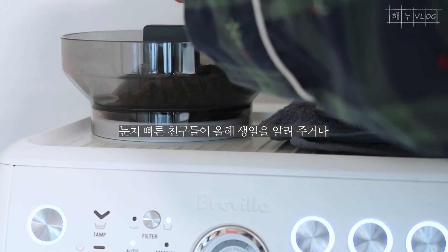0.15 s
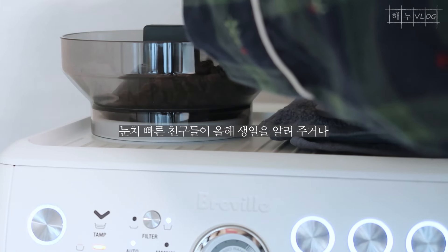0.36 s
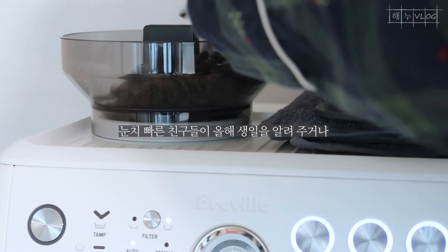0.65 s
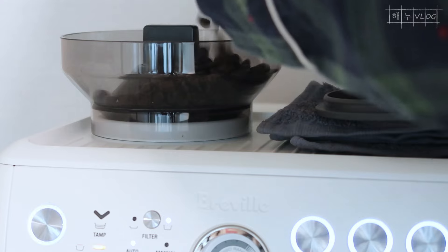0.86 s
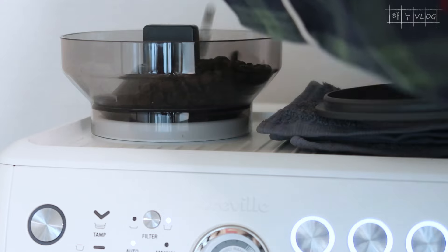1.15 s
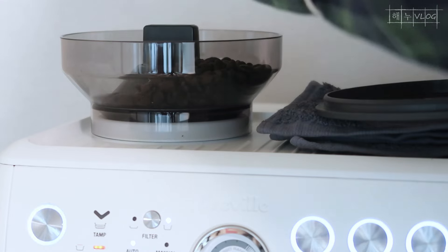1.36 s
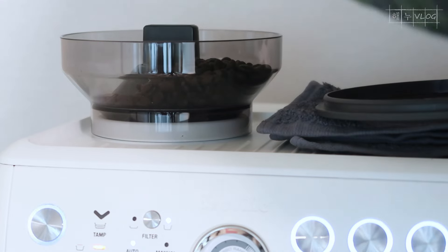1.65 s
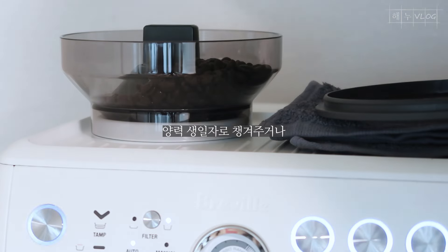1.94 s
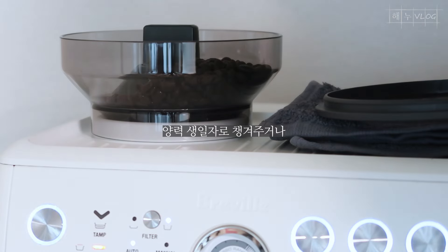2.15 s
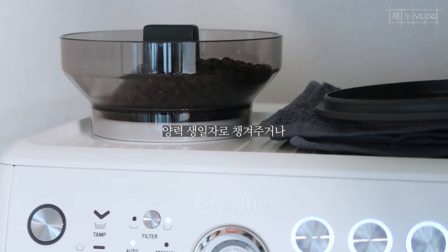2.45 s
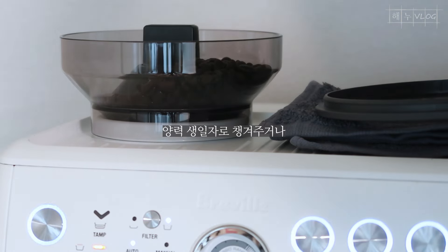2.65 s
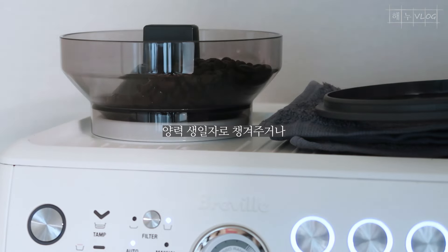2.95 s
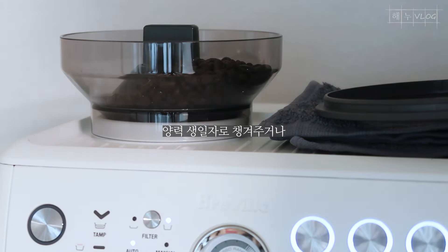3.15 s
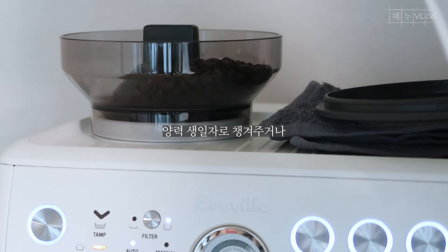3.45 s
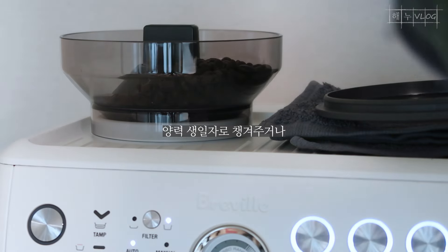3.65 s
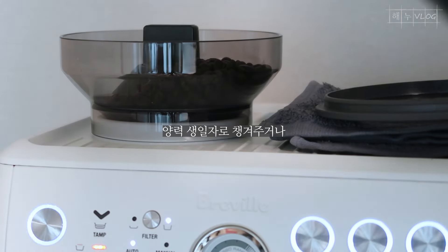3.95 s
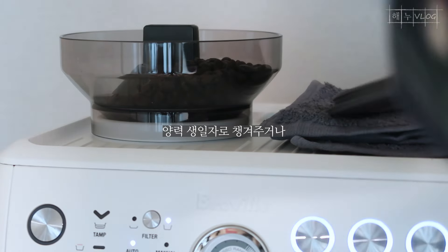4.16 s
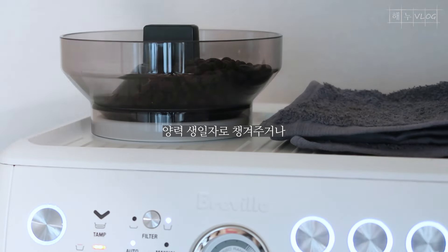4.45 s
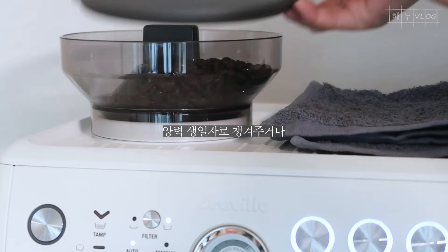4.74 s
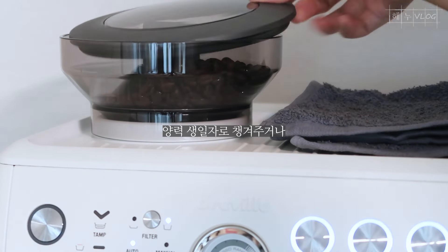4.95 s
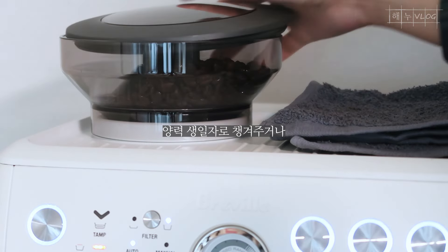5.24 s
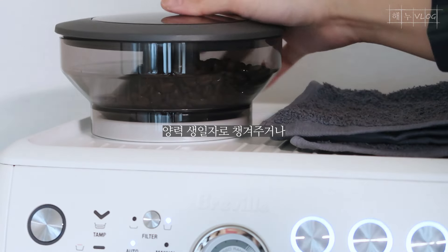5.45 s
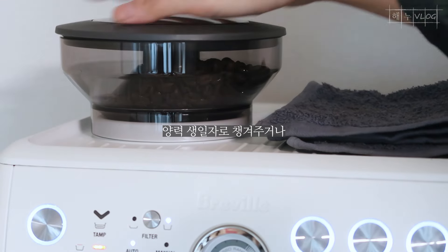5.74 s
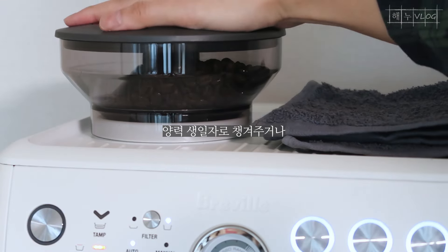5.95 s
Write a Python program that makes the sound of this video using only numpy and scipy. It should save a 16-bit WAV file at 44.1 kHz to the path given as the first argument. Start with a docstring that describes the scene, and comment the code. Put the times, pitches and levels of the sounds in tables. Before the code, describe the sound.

Coffee beans are shaken into a grinder's plastic hopper from the start, rattling in bright, uneven bursts that ring the wall and thin out by about 1.5 seconds. From 1.8 seconds a hard canister slides on the counter with a faint gritty scrape and light taps, and one firmer knock near 2.4 seconds. Two louder clusters of sharp knocks follow at about 3.4 and 3.6 seconds. At 4.2 seconds a plastic lid is lifted with a light clack. It clatters onto the hopper around 4.9 seconds, its rim rubbing briefly, then is pressed down with soft clicks and hollow thumps near 5.3, 5.5 and 5.9 seconds while the casing rumbles faintly. Everything is heard close up in a small kitchen with a short echo, over a low appliance hum and soft room noise.

```python
"""In a small kitchen, coffee beans are shaken from a hard canister into a grinder's hopper (its funnel).
The beans tick against each other and make the hopper wall ring. The canister slides and knocks on the
counter. Then a plastic lid is lifted, dropped on the hopper and pressed home, and the casing shudders.
An appliance hums over the room noise. Two close microphone ports hear it, differing mainly in treble."""
import sys
import numpy as np
from scipy import signal
from scipy.fft import rfft, irfft, next_fast_len
from scipy.io import wavfile
from scipy.ndimage import uniform_filter1d

SR = 44100
rng = np.random.default_rng(int(sys.argv[2]) if len(sys.argv) > 2 else 0)


def generate_wav(signal):
    """Clip the signal to [-1, 1] and save it as 16-bit WAV at the path in sys.argv[1]."""
    frames = np.transpose(np.atleast_2d(signal))
    scaled = np.clip(frames, -1, 1) * 32767
    pcm = np.round(scaled).astype(np.int16)
    wavfile.write(sys.argv[1], SR, pcm)


N = 268569
T = np.arange(N) / SR


def undb(db):
    """Turn decibels into a number to multiply by."""
    return 10 ** (np.asarray(db) / 20)


def at_hz(table, hz):
    """Read between rows of (pitch in Hz, value), spacing octaves evenly."""
    pitches, values = np.transpose(table)[:2]
    return np.interp(np.log(np.maximum(hz, 1)), np.log(np.maximum(pitches, 1)), values)


def colour(x, table):
    """Change a sound's tone by rows of (pitch in Hz, gain in dB)."""
    return irfft(rfft(x) * undb(at_hz(table, np.fft.rfftfreq(len(x), 1 / SR))), len(x))


def unit(x):
    """Scale a sound to an average (rms) level of 1."""
    return x / np.sqrt(np.mean(x ** 2))


def wander(rate):
    """A smooth random wobble of about 1, with a new target rate times a second."""
    hold = int(SR / rate)
    steps = np.repeat(rng.standard_normal(N // hold + 1), hold)
    return 1.3 * uniform_filter1d(uniform_filter1d(steps, hold), hold)[:N]


def curves(table):
    """Join timed rows into one dB curve per column, silent before and after."""
    times, *columns = np.transpose(table)
    return [np.interp(T, times, column, left=-120, right=-120) for column in columns]


def clicks(rate, scatter_db):
    """Random clicks of uneven size, about rate of them a second."""
    spikes = (rng.random(N) < rate / SR) * rng.choice([-1, 1], N)
    return spikes * undb(scatter_db * np.minimum(rng.exponential(size=N), 4))


def ring(hz, db, fade_s):
    """A struck object's tones: each has a slightly random strength and falls 60 dB in fade_s."""
    t = np.arange(int(min(fade_s.max(), .08) * SR)) / SR
    gain = undb(db + 2 * rng.standard_normal(len(hz)))
    gain *= (-1) ** np.arange(len(hz))  # neighbours swing opposite ways
    return gain @ (np.exp(-np.log(1000) * t / fade_s[:, None]) * np.sin(2 * np.pi * hz[:, None] * t))


def contacts(length_ms, swell, count):
    """One blow is many tiny touches; they grow for the share of it called swell, then weaken."""
    touches, chance = np.zeros(2048), rng.random((count, 2))
    place = np.r_[0, chance[1:, 0]]
    shape_db = np.where(place < swell, -14 * (1 - place / swell), -8 * (place - swell) / (1 - swell))
    when = (place * length_ms * SR / 1000).astype(int)
    np.add.at(touches, when, undb(3.1 * np.log(chance[:, 1]) + shape_db))
    spectrum = rfft(touches)
    even = spectrum / np.sqrt(uniform_filter1d(np.abs(spectrum) ** 2, size=5))  # favour no pitch
    return irfft(even) * (np.arange(2048) < 1500)


def blows(events, tones, tilt, band_hz, crack_db, crack_cycles, crack_fade_s, swell, touches):
    """Each blow rings the object's tones plus a crack of short ones; its peak is set within band_hz."""
    out, crack_hz = np.zeros(N), np.geomspace(110, 15000, 64)
    own_hz, own_db, own_fade_s = tones
    crack_levels = crack_db - 20 * np.clip(np.log2(220 / crack_hz), 0, 1)  # weaker in the bass
    band = signal.butter(2, band_hz, "band", fs=SR, output="sos")
    for start, peak_db, favoured_hz, length_ms, *tilt_settings in events:
        hz = np.r_[own_hz, crack_hz]
        hz *= undb(.12 * rng.standard_normal(len(hz)))  # slightly out of tune each time
        fade_s = np.r_[own_fade_s, np.minimum(crack_cycles / hz[-64:] + .002, crack_fade_s)]
        db = np.r_[own_db, crack_levels] + at_hz(tilt(*tilt_settings), hz)
        db += 7.1 * np.exp(-(np.log(hz / favoured_hz) / 0.15) ** 2)  # the struck spot favours a pitch
        blow = signal.fftconvolve(ring(hz, db, fade_s), contacts(length_ms, swell, touches))
        blow *= undb(peak_db) / np.abs(signal.sosfilt(band, blow)).max()
        first = int(start * SR)
        out[first:first + len(blow)] += blow[:N - first]
    return out


# The tone of the room noise. Each row: pitch in Hz, relative level in dB.
NOISE_TONE = [(12, -66), (20, -9.5), (49, -7), (207, -12.5), (245, -8.5), (362, -13.5), (416, -10.5),
              (519, -15.5), (746, -13), (1040, -20.5), (1230, -19), (1630, -22.5), (1820, -22.5),
              (13100, -44.5), (15500, -118)]
# How much that noise differs between the ports. Each row: pitch in Hz, side compared with mid in dB.
NOISE_SIDE = [(60, -31), (110, -11.5), (200, -7), (380, -3), (700, -7), (1290, -3.5), (2380, -1),
              (4400, 1.5), (8120, 0.5), (15000, 0)]


def room_noise():
    """A soft, flickering rush: what both ports share (mid) and how they differ (side)."""
    mid, side = np.zeros(N), colour(colour(rng.standard_normal(N), NOISE_TONE), NOISE_SIDE)
    for low, high in [(10, 150), (150, 600), (600, 2500), (2500, 20000)]:
        band = colour(rng.standard_normal(N), [(low / 1.1, -60), (low, 0), (high, 0), (high * 1.1, -60)])
        flicker_db = (1.46 + 0.69 * np.exp(-low / 900)) * wander(3.94)
        mid += undb(flicker_db) * colour(band, NOISE_TONE)
    gain = undb(-59.5) / np.std(colour(mid, [(280, -60), (300, 0)]))  # sets the level above 300 Hz
    return gain * mid, gain * side


# A low appliance hum, plus faint high tones. Each row: pitch in Hz, average level in dB, waver in dB.
BACKGROUND_TONES = [(59.2, -68, 1.2), (241, -60, 3), (13006, -92, 2.5), (14357, -98, 2.5)]


def hum_and_high_tones():
    """A low appliance hum, plus faint, thin high tones; all of them waver a little."""
    out = np.zeros(N)
    for hz, db, waver_db in BACKGROUND_TONES:
        height = np.sqrt(2) * undb(db + waver_db * wander(11))
        out += height * np.sin(2 * np.pi * hz * T + 0.72 * wander(8.5))
    return out


# The hopper wall's tones. Each row: pitch in Hz, width in Hz (wider dies sooner), relative level in dB.
HOPPER_TONES = [(1185, 47, -0.5), (2163, 25, 3), (2970, 51, 3), (3730, 36, -2.5), (4390, 123, 11.5),
                (5125, 17, 1), (5203, 52, 4.5), (6100, 86, 7), (6656, 59, 2), (7434, 124, 10.5),
                (7950, 43, 1.5), (8960, 190, 6), (10500, 40, -11.5), (11330, 78, -10)]
# Beans rolling between handfuls. Each row: time in seconds, level in dB.
ROLL_LEVELS = [(0, -38), (.045, -45.5), (.09, -41.5), (.135, -46), (.24, -47.5), (.3, -56.5), (.33, -50.5),
               (.385, -58.5), (.405, -43), (.465, -50.5), (.5, -39.5), (.57, -42), (.615, -37), (.655, -43),
               (.695, -41.5), (.72, -39), (.745, -34), (.77, -34), (.81, -39), (.86, -41), (.92, -37.5),
               (.965, -46), (1.0, -40.5), (1.075, -46), (1.11, -38.5), (1.15, -43), (1.19, -50),
               (1.23, -47.5), (1.35, -46), (1.5, -53.5), (1.62, -78)]
# The tone of bean ticks. Each row: pitch in Hz, relative level in dB.
TICK_TONE = [(290, -64), (500, -16), (1030, -20), (1160, 1.5), (1300, -4.5), (2200, -2), (2700, -2.5),
             (2960, 1.5), (3250, -4), (6000, -4), (11600, -15.5), (15500, -36)]


def beans_rolling():
    """Rolling beans tick and ring the wall; a faster roll is less hollow and fizzes more."""
    level_db, = curves(ROLL_LEVELS)
    speed_db = np.clip(level_db + 45.5, -12, 12)  # 0 is a middling roll
    hollow_db, fizz_db = -12 - 0.7 * speed_db, -7 + 0.34 * speed_db
    ticks = unit(colour(clicks(2600, 2.5) * undb(3.4 * wander(43.82)), TICK_TONE))
    hz, width, db = np.transpose(HOPPER_TONES[:1])  # only the lowest tone
    fade_s = 1.2 * np.minimum(0.78 / width, .014)
    hollow = unit(signal.fftconvolve(clicks(250, 0.79), ring(hz, db, fade_s))[:N])
    fine_ticks = clicks(3300, 3.1) * undb(5.5 * wander(60.4))
    fizz = unit(colour(fine_ticks, [(5000, -15), (9000, -4), (15000, -15)]))
    return undb(level_db) * (ticks + undb(hollow_db) * hollow + undb(fizz_db) * fizz)


def stray_handfuls(count, length_ms=10, hollow_db=-8, fizz_db=-5):
    """Rows for small handfuls at chance moments, louder where the roll is louder."""
    times, roll_db = np.transpose(ROLL_LEVELS)
    chance = rng.random((count, 3))
    starts = times[-2] * (np.arange(count) + chance[:, 0]) / count
    hz = np.array(HOPPER_TONES)[1 + (chance[:, 1] * 9).astype(int), 0]
    peak_db = np.interp(starts, times, roll_db) + 13 - 5 * chance[:, 2]
    return [(*row, length_ms, hollow_db, fizz_db) for row in zip(starts, peak_db, hz)]


# Handfuls landing. Each row: start in seconds, peak in dB, favoured pitch in Hz, length in ms,
# hollow ring in dB, fizz in dB.
BEAN_HANDFULS = [(0.0155, -25.5, 2190, 9.4, -5, -3), (0.054, -21.5, 7100, 7, -47, 5),
                 (0.064, -27, 4310, 12.7, -28, -3), (0.080, -24, 4130, 15, -22, -1),
                 (0.1134, -33, 2930, 13, -32, 0), (0.1653, -28, 2940, 12.5, -13, 3),
                 (0.198, -28, 2220, 9, -13.5, 2), (0.233, -33, 2700, 8.4, -24, -2),
                 (0.285, -43, 6100, 8, -30, 1), (0.312, -32, 2240, 10, -6, -6),
                 (0.399, -27.5, 2320, 10, -10, 4), (0.4262, -34.5, 3690, 8.8, 6.5, 1),
                 (0.4722, -13, 2650, 8.5, -23, 1.5), (0.5541, -28.5, 2200, 12, -7.5, 7),
                 (0.586, -26, 8140, 13, -6, -2), (0.597, -19.5, 2890, 9.3, -17, 0),
                 (0.6096, -25.5, 7900, 16, -3, -1), (0.6706, -18.5, 5770, 12.8, -10.5, -2),
                 (0.7095, -29.5, 2240, 12, -2, -4), (0.735, -20.5, 5800, 16, -11, -1),
                 (0.7433, -21.5, 3020, 12, -20, -3), (0.752, -18.5, 2830, 11, -17, -7),
                 (0.779, -16.5, 6100, 10.6, -22, 3), (0.812, -23.5, 5970, 16, -35, -1),
                 (0.8345, -15.5, 2870, 12.7, -39, 1), (0.8707, -18.5, 6070, 9.3, -15, 5),
                 (0.908, -21.5, 2900, 11.3, -11, -2), (0.9244, -31, 2950, 14.7, -29, -3),
                 (0.984, -23.5, 2900, 19, -10.5, -1), (1.0092, -27.5, 2950, 17, -4.5, 3),
                 (1.087, -20.5, 5660, 9, -33, 0), (1.0957, -19, 4800, 10.3, -18.5, 1.5),
                 (1.113, -32, 4400, 8.5, -20, 3), (1.1667, -29, 6070, 12, -17, -2),
                 (1.2008, -19.5, 5300, 8, -23, 1), (1.213, -26.5, 4430, 9.1, -36, -2),
                 (1.268, -28, 2420, 19, -9, 4), (1.297, -34, 7950, 8, -11, 0),
                 (1.3651, -25.5, 2420, 11, -22, 4), (1.4225, -32, 3000, 9.4, -26, -3),
                 (1.4493, -31, 2940, 9.5, -33, -10), (1.4835, -34, 2950, 8.7, -35, -13)]


def beans_landing():
    """Each handful is a burst of tiny hits that rings the hopper wall."""
    def tilt(hollow, fizz):
        return [(500, hollow - 14), (1100, hollow + 14), (2500, 0), (7000, 0),
                (11000, fizz + 6), (15000, fizz + 0.51)]
    hz, width, db = np.transpose(HOPPER_TONES)
    tones = hz, db, np.minimum(0.78 / width, .014)
    return blows(BEAN_HANDFULS + stray_handfuls(count=12), tones, tilt, band_hz=(1500, 12000),
                 crack_db=0.54, crack_cycles=14.7, crack_fade_s=0.025, swell=0.4, touches=40)


# The canister being dragged and handled. Each row: time in seconds, level in dB, treble in dB.
SLIDE_LEVELS = [(1.75, -62, -19), (1.974, -52.5, -10), (2.122, -61, -13), (2.24, -52.5, -11.5),
                (2.41, -45.5, -13.5), (2.476, -44.5, -20), (2.632, -67.5, -7), (2.66, -51, -14),
                (2.972, -57.5, -8.5), (3.1, -67.5, -6), (3.13, -44.5, -10.5), (3.17, -48, -7.5),
                (3.22, -52, -5), (3.27, -53, -4), (3.348, -49.5, -6.5), (3.4, -41.5, -5),
                (3.47, -48.5, -12), (3.54, -58.5, 0)]


def canister_slide():
    """The canister sticks and slips on the counter, making a gritty scrape."""
    level_db, treble_db = curves(SLIDE_LEVELS)
    grit = clicks(1500, 1.1) * undb(2.6 * wander(29.91))
    dull = unit(colour(grit, [(110, -5), (190, 3.5), (350, -1), (1200, 1), (2500, -2), (5000, -53)]))
    sharp = unit(colour(grit, [(1500, -15.5), (3500, 1), (8000, -10), (11000, -13), (15000, -24)]))
    return undb(level_db) * (dull + undb(treble_db) * sharp)


# The canister's tones. Each row: pitch in Hz, relative level in dB, fade time in seconds.
CANISTER_TONES = [(310, 4, 0.028), (427, -2.5, 0.036), (855, -3, 0.013), (1199, -13, 0.05),
                  (1503, -7.5, 0.022), (1665, -7.5, 0.05), (2088, -13.5, 0.05)]
# Its knocks. Each row: start in seconds, peak in dB, favoured pitch in Hz, length in ms,
# then low thud, hard edge and high tick, each in dB.
CANISTER_KNOCKS = [(1.782, -39.5, 1080, 6.4, -25, -3, -22), (1.9, -38.5, 2100, 6.5, -43, 1, -31),
                   (1.977, -39.5, 1670, 8.1, -48, 6, -9), (2.227, -30.5, 1670, 6.2, -24, -8, -44),
                   (2.374, -33, 510, 5.3, 0, 5, -27), (2.411, -27, 1370, 7.7, -19, 9.5, -10),
                   (2.443, -17.5, 2200, 3.9, -13.5, 6.5, -22), (2.519, -33, 307, 10, -11, -14, -30),
                   (2.645, -30.5, 1350, 4.9, -23, 2, -30), (2.831, -38, 417, 6.6, -22, -10, -41),
                   (2.918, -41.5, 1080, 8.5, -25, -7, -28), (2.987, -38.5, 684, 8.1, -13.5, -3, -24),
                   (3.114, -35, 2040, 5.7, -11, -1, -21), (3.133, -30, 756, 9, -18, -10, -23),
                   (3.177, -39, 1470, 3.1, -26, 0.5, -20), (3.207, -36.5, 2800, 7.5, -19, 3, -10.5),
                   (3.308, -38, 394, 7.8, -17, -9, -29), (3.369, -21, 500, 4.8, -13, 0, -21),
                   (3.375, -19.5, 920, 3.75, -11.5, -10, -20), (3.395, -23.5, 900, 4, -17, 9, -10),
                   (3.399, -17.5, 1000, 2.5, -14, 8.5, -6), (3.406, -18, 1300, 2.5, -27, 13, -2.5),
                   (3.411, -22, 1500, 8.2, -16, 9, -6), (3.422, -27, 940, 11, -11.5, 7, -19),
                   (3.551, -16.5, 505, 3.1, -5.5, 2, -24), (3.556, -23, 2830, 3.1, -17, 9, -11),
                   (3.588, -19.5, 2100, 3.2, -26, -2, -22), (3.601, -21, 2020, 10.3, -28, 3, -12),
                   (3.611, -11, 1580, 1.49, -28, 8, -16), (3.615, -14.5, 1020, 3.17, -17, 5.5, -4),
                   (3.621, -24, 900, 6.4, -15, 0, -20), (3.651, -20, 438, 4, -12, -13, -30),
                   (3.656, -19.5, 415, 5.45, -10, 10.5, -8.5), (3.664, -30.5, 1400, 20.6, -14, -4, -24),
                   (3.699, -33, 470, 17, -9, -12, -42)]


def canister_knocks():
    """The hard canister bumps the counter and rings briefly."""
    def tilt(thud, edge, tick):
        return [(120, thud - 4), (200, thud + 5), (300, thud + 5), (430, thud + 11), (1300, 0.4),
                (3000, edge), (5500, tick + 12), (9000, tick + 3), (14000, tick - 12)]
    return blows(CANISTER_KNOCKS, np.transpose(CANISTER_TONES), tilt, band_hz=(300, 6000),
                 crack_db=0.95, crack_cycles=16.2, crack_fade_s=0.025, swell=0.22, touches=12)


# The lid's tones. Each row: pitch in Hz, relative level in dB, fade time in seconds.
LID_TONES = [(102, 7.5, 0.12), (196.3, 4.5, 0.068), (261, -1, 0.062), (352, -1, 0.035), (445, 1, 0.027),
             (518, 4, 0.044), (727, 3.5, 0.029), (863, 3, 0.033), (1222, -6, 0.042), (1366, -9, 0.028)]
# The lid leaving the counter, then hitting the hopper. Each row: start in seconds, peak in dB, favoured
# pitch in Hz, length in ms, then thud, body, clack and tick, each in dB, and the tick's pitch in Hz.
LID_KNOCKS = [(4.187, -30.5, 1270, 6.6, -34, -26, 21, 5, 2600),
              (4.189, -40, 2020, 4.9, -34, -30, 8, 6, 6500), (4.199, -39, 960, 17, -28, -9, 14, -1, 2720),
              (4.22, -45.5, 900, 20, -28, -16, 11, -6, 2700), (4.861, -25, 374, 3.8, -34, -2, 0, 3, 2500),
              (4.867, -26, 380, 7, -30, -2, 6.5, 2, 4540), (4.88, -36, 750, 23.5, -20, 1, -3, 0, 2900),
              (4.912, -27, 696, 8.4, -30, -2, -4, 3, 3000), (4.919, -23, 204, 8.2, -28, 6, 0, -1, 4400),
              (4.930, -36.5, 520, 12, 0, 1, -8, 19, 5100), (4.939, -43, 200, 14, -19, 1.5, -12, 13, 4400),
              (4.955, -44, 446, 14, 6, -1, -8, 2, 5100), (5.269, -33, 505, 7.2, -20, -8, -28, -11, 5000),
              (5.283, -40.5, 105, 11, 9, 0.5, 1, 14.5, 4470),
              (5.298, -39.5, 260, 7.1, 14, 12, -12, -2, 4500),
              (5.315, -37.5, 530, 13, 2.5, 1.5, -26, 10, 4700),
              (5.335, -42, 420, 9.6, -8, 14, -23, -5, 5500),
              (5.408, -41.5, 493, 10.5, -18, -8, -42, -24, 4400),
              (5.51, -44, 447, 10.7, -1, 0, -5, -20, 3000), (5.539, -44, 397, 11.6, 1, 7, 8, 18, 2930),
              (5.550, -42.5, 105, 11.6, 8.5, 1, 3, 17.5, 6150),
              (5.563, -43.5, 103, 9.4, 21, 3, -9, 1.5, 5100), (5.651, -61, 236, 8.6, -8, 4, -15, -10, 6100),
              (5.892, -29.5, 525, 4.2, -13, 2, -20, -17, 3000),
              (5.899, -34, 200, 9.85, -10, 7, -22, -30, 3000), (5.985, -48, 200, 14, -1, -8, 4.5, 4, 2600)]
# Its rim rubbing the hopper wall. Each row: time in seconds, level in dB.
RUB_LEVELS = [(4.87, -64), (4.89, -68), (4.92, -51), (4.94, -43), (4.97, -66), (5.0, -58), (5.05, -75),
              (5.26, -88), (5.28, -62), (5.33, -63), (5.4, -87), (5.53, -76), (5.55, -60), (5.6, -82),
              (5.66, -83)]


def lid():
    """The lid and hollow hopper thump low; the rim clacks, rubs and rings the hopper wall."""
    def tilt(thud, body, clack, tick, tick_hz):
        dip = min(thud, body)
        return [(105, thud), (125, dip - 9), (160, dip - 7), (200, body), (280, body - 5),
                (360, -1.5), (520, -2.5), (800, -7.5), (1400, clack), (tick_hz / 1.28, tick - 6),
                (tick_hz, tick), (tick_hz * 1.37, tick - 7), (14000, tick - 24)]
    hz, db, fade_s = np.transpose(LID_TONES)
    wall_hz, width, wall_db = np.transpose(HOPPER_TONES[2:])
    wall_fade_s = np.minimum(1.7 / width, .02)
    tones = np.r_[hz, wall_hz], np.r_[db, wall_db - 13], np.r_[fade_s, wall_fade_s]
    knocks = blows(LID_KNOCKS, tones, tilt, band_hz=(150, 1500),
                   crack_db=-0.35, crack_cycles=21.7, crack_fade_s=.03, swell=0.35, touches=30)
    grit = clicks(1200, 2.5) * undb(3.42 * wander(50.5))
    wall = unit(signal.fftconvolve(grit, ring(wall_hz, 0.65 * wall_db, .6 * wall_fade_s))[:N])
    scrape = unit(colour(grit, [(700, -16), (1800, 0), (5000, -1), (8000, -21), (14000, -38)]))
    rub_db, = curves(RUB_LEVELS)
    return knocks + undb(rub_db) * (wall + undb(-3.5) * scrape)


# The casing's shudder. Each row: time in seconds, level in dB.
SHUDDER_LEVELS = [(4.85, -74), (4.914, -62), (4.986, -55), (5.01, -61), (5.054, -55), (5.126, -65),
                  (5.16, -58), (5.244, -67), (5.288, -55), (5.318, -56), (5.408, -66), (5.442, -59),
                  (5.494, -58), (5.572, -58), (5.65, -58), (5.716, -70), (5.746, -68), (5.784, -85),
                  (5.87, -72), (5.904, -52), (6.004, -56), (6.09, -62)]
# Its deep tone. Each row: pitch in Hz, relative level in dB.
SHUDDER_TONE = [(35, -22), (55, 1), (75, 0), (98, 2), (120, -22), (200, -58)]


def casing_shudder():
    """The grinder's shell rumbles under the lid and the pressing hand."""
    level_db, = curves(SHUDDER_LEVELS)
    return undb(level_db) * unit(colour(rng.standard_normal(N), SHUDDER_TONE))


# The kitchen's echo. Each row: pitch in Hz, fade time in seconds before time_scale shortens it.
ECHO_FADES = [(150, 0.52), (500, 0.46), (2000, 0.4), (6000, 0.28), (14000, 0.23)]


def room_echo(time_scale):
    """The room's answer to one click: noise that dies sooner in the treble."""
    t, echo = np.arange(SR // 2) / SR, 0
    noise, octave = rfft(rng.standard_normal(len(t))), np.log2(np.fft.rfftfreq(len(t), 1 / SR) + 1)
    for centre in np.arange(5, 15.5, .5):
        band = irfft(noise * np.clip(1 - 2 * np.abs(octave - centre), 0, 1), len(t))
        echo += band * np.exp(-np.log(1000) * t / (time_scale * at_hz(ECHO_FADES, 2 ** centre)))
    spectrum = rfft(echo * np.minimum(t / 0.0012 / time_scale, 1))  # a quick fade in
    power = np.abs(spectrum) ** 2
    ripple = uniform_filter1d(power, size=31) / uniform_filter1d(power, size=301)
    echo = irfft(spectrum / np.sqrt(ripple))[:-2000]  # the echo favours no pitch
    return echo / np.sqrt(np.sum(echo ** 2))


# The tone of the difference between the ports. Each row: pitch in Hz, gain in dB.
PORT_TONE = [(60, -45), (200, -21), (700, -11.5), (1300, -8.5), (2400, -11), (3300, -5.5), (4400, 5),
             (6000, 7.5), (8100, 10.5), (11000, 15.5), (15000, 16)]


def port_difference(direct):
    """The two ports catch each tick at different points of its wave, and hear different echoes."""
    turn = np.exp(-1j * (np.pi / 2 + 1.33 * wander(160)))
    shifted = (signal.hilbert(direct, next_fast_len(N))[:N] * turn).real
    echoes = undb(-20.5) * room_echo(0.056) + undb(-16.5) * room_echo(0.95)  # near and far
    return colour(undb(-14) * shifted + signal.fftconvolve(direct, echoes)[:N], PORT_TONE)


# The tone of what the walls send back. Each row: pitch in Hz, gain in dB.
WALL_TONE = [(150, -3), (330, -0.5), (700, -1), (2000, -2.5), (4000, -1.5), (9000, 0)]


def scene():
    """Mix the sounds with the kitchen's echo into left and right."""
    direct = beans_landing() + beans_rolling() + canister_knocks() + canister_slide() + lid()
    bass_cut = signal.butter(2, 85, "high", fs=SR, output="sos")  # the microphone passes no deep bass
    direct = signal.sosfilt(bass_cut, direct)
    echo = colour(signal.fftconvolve(direct, room_echo(0.92))[:N], WALL_TONE)
    difference = port_difference(direct)
    noise_mid, noise_side = room_noise()
    mid = direct + undb(-6.5) * echo + noise_mid + hum_and_high_tones() + casing_shudder()
    side = difference + noise_side
    return np.array([mid + side, mid - side])


def record(dry):
    """The microphone softens the highest treble, and the recorder cuts off above 15500 Hz."""
    soft = signal.sosfilt(signal.butter(3, 14300, fs=SR, output="sos"), dry)
    return signal.sosfilt(signal.ellip(10, .2, 80, 15500, fs=SR, output="sos"), soft)


dry = scene()
out = record(dry)
generate_wav(out)
```